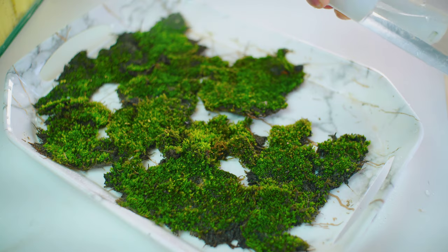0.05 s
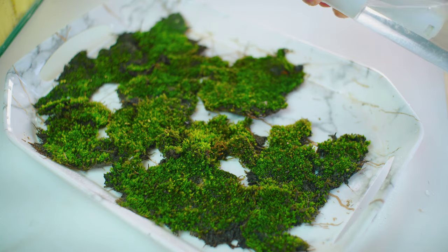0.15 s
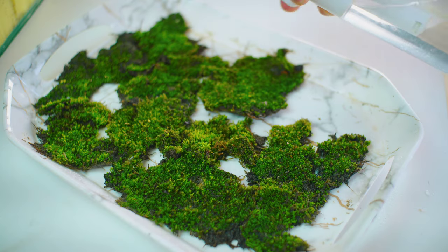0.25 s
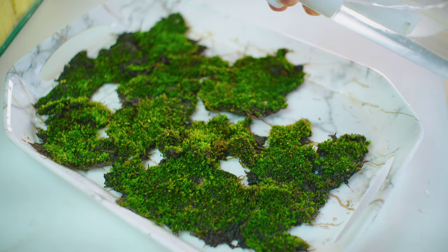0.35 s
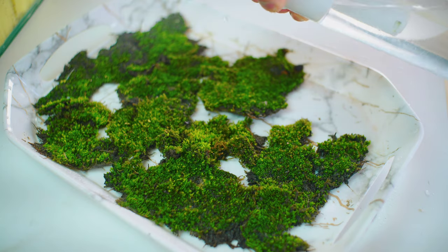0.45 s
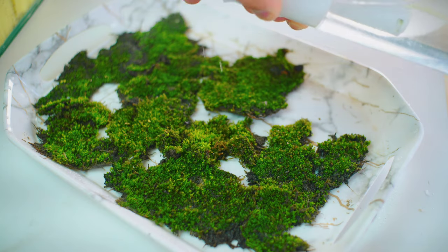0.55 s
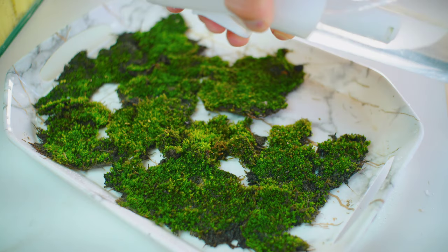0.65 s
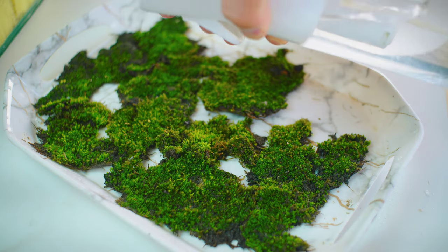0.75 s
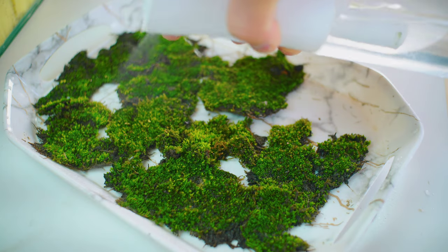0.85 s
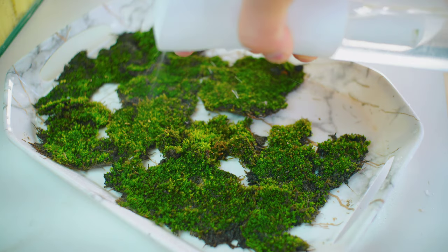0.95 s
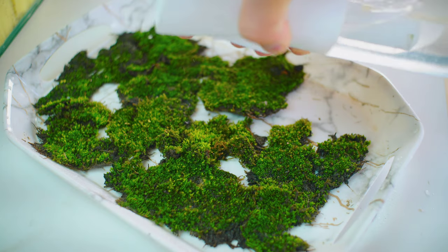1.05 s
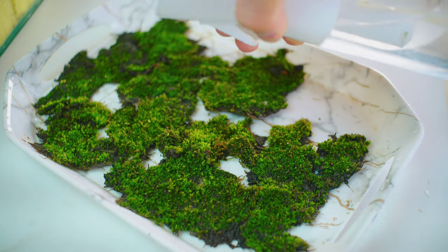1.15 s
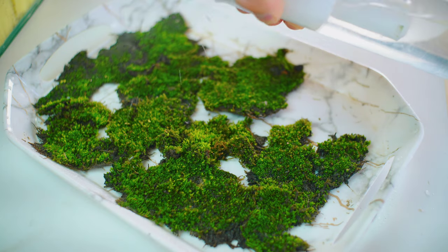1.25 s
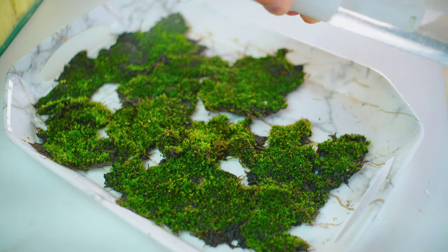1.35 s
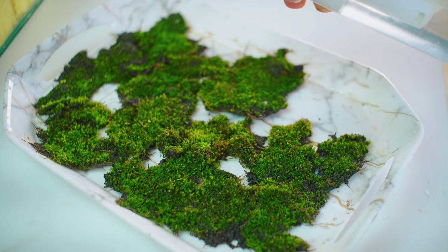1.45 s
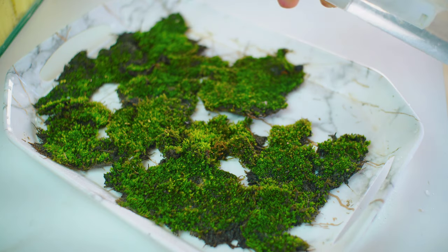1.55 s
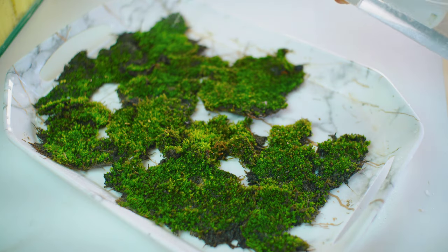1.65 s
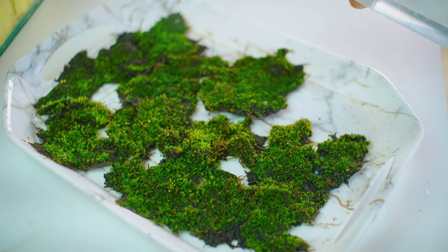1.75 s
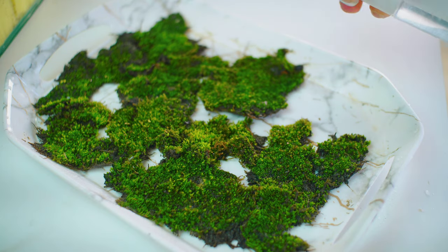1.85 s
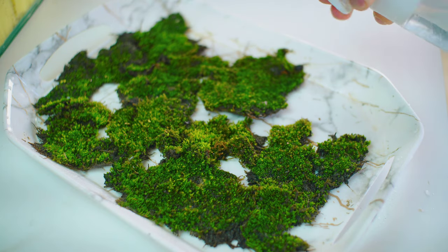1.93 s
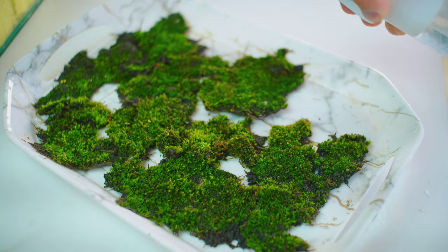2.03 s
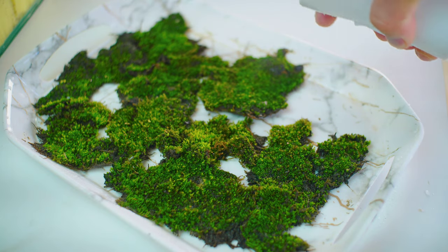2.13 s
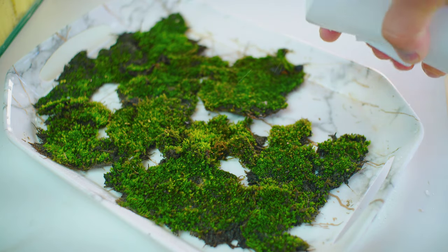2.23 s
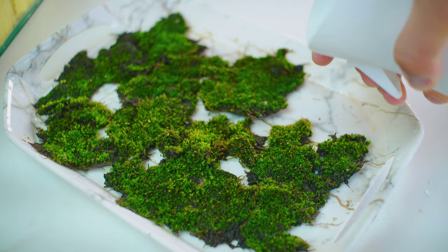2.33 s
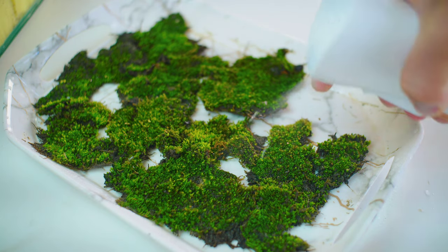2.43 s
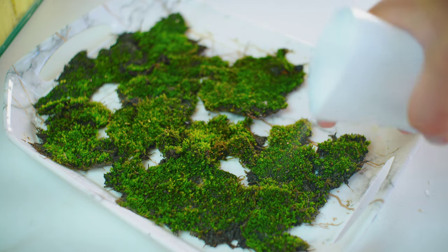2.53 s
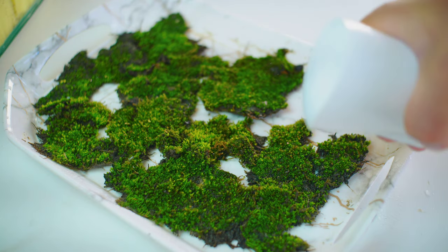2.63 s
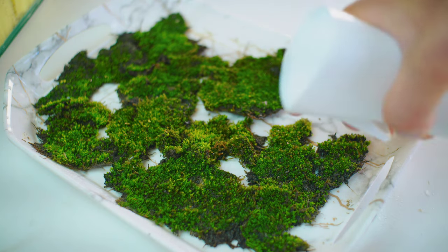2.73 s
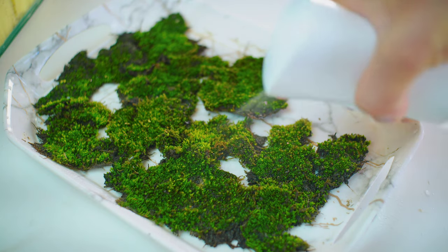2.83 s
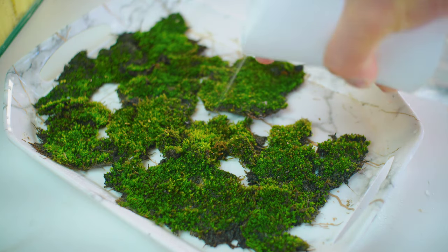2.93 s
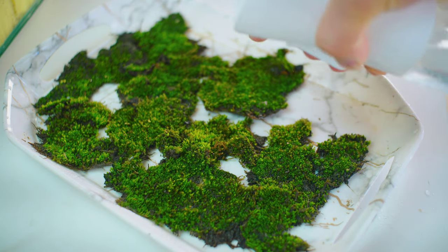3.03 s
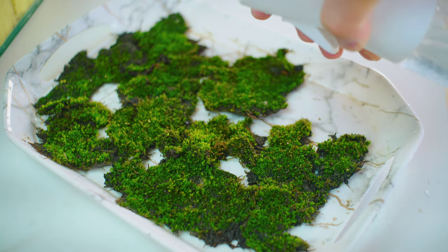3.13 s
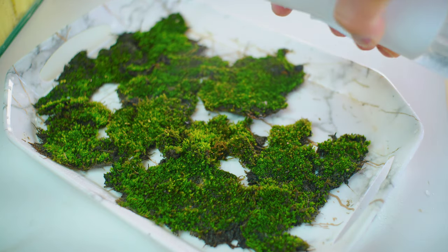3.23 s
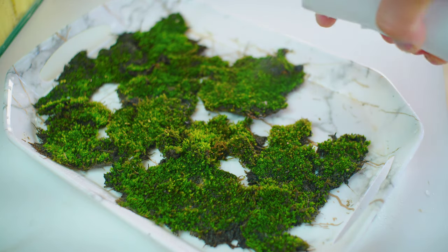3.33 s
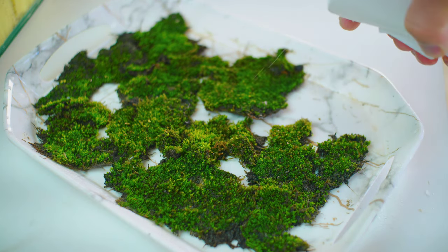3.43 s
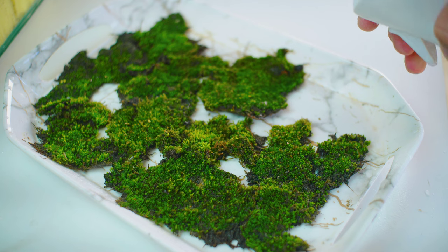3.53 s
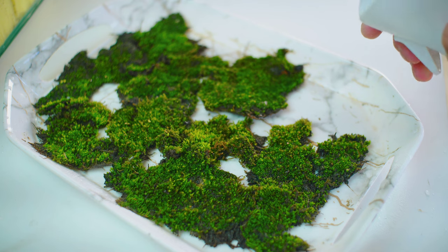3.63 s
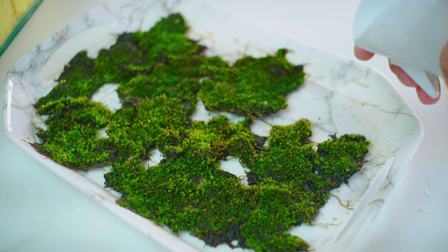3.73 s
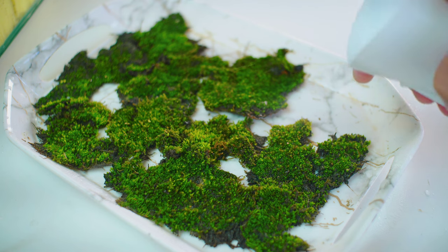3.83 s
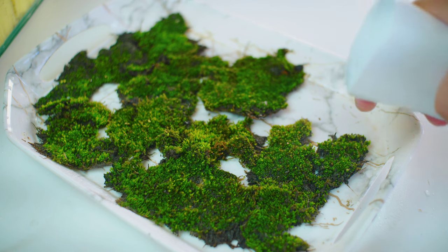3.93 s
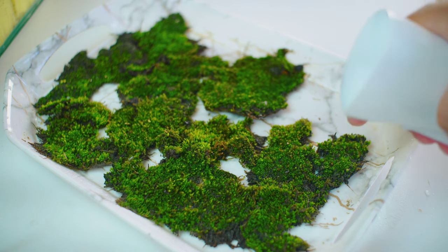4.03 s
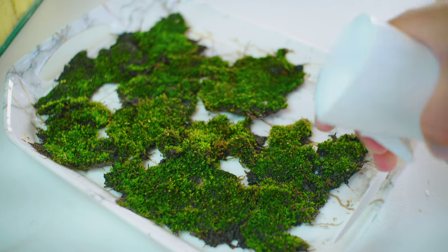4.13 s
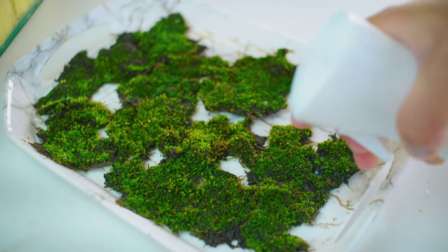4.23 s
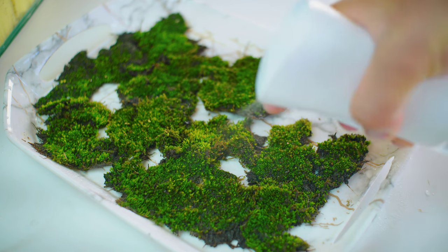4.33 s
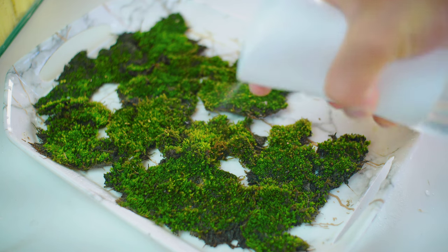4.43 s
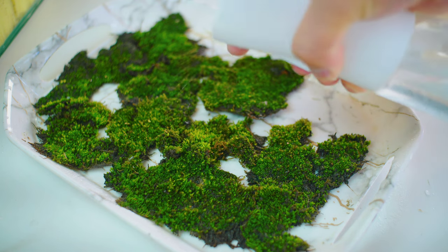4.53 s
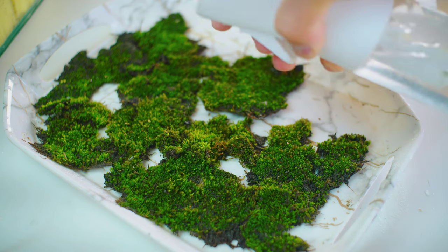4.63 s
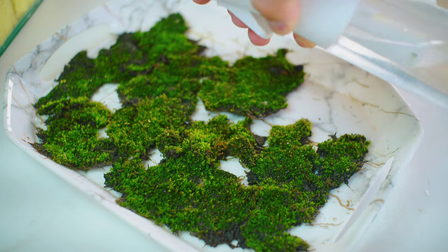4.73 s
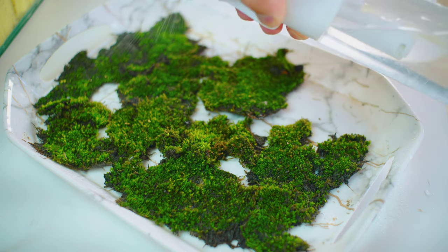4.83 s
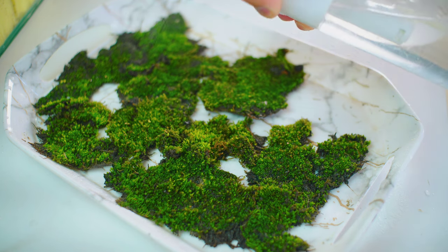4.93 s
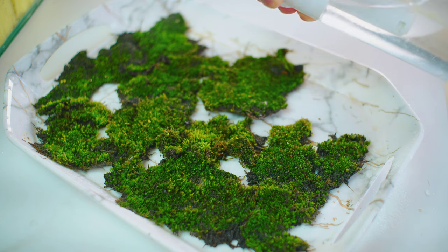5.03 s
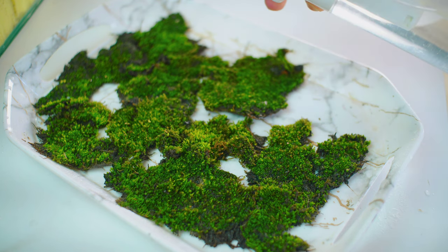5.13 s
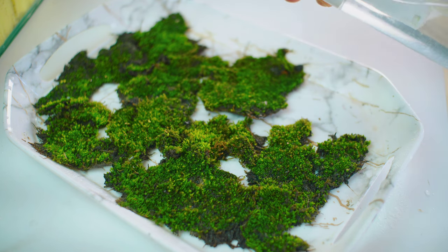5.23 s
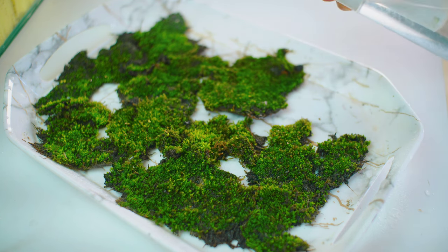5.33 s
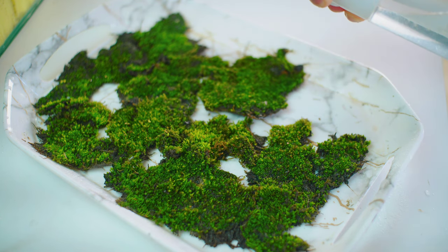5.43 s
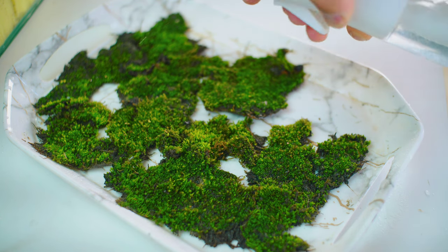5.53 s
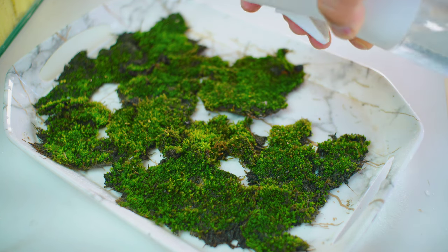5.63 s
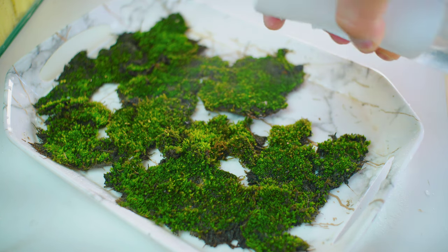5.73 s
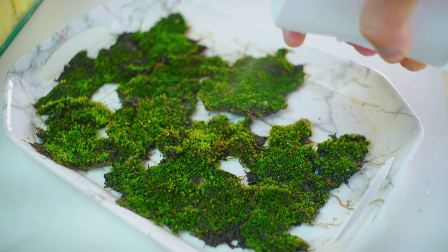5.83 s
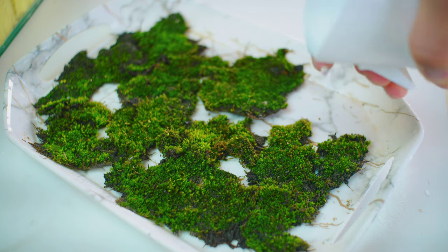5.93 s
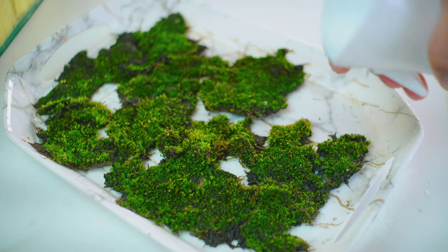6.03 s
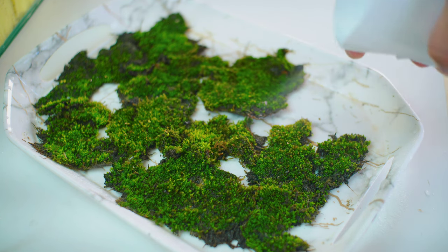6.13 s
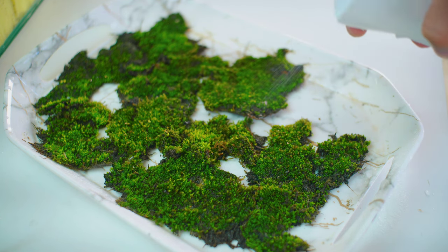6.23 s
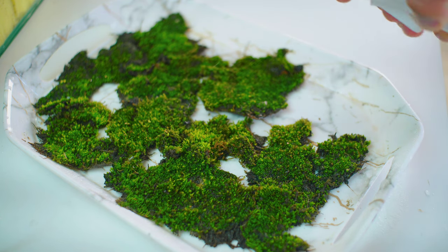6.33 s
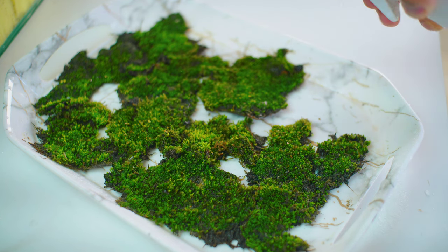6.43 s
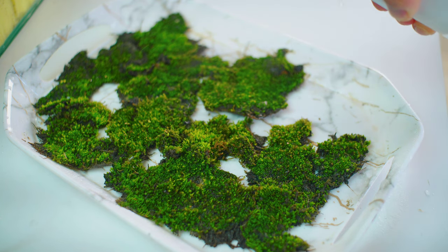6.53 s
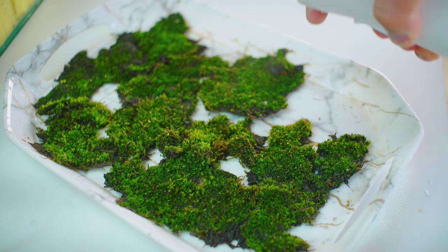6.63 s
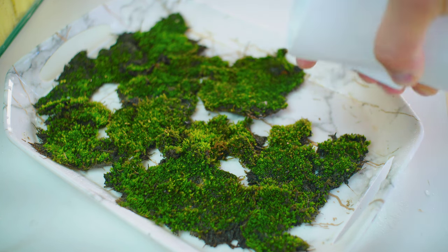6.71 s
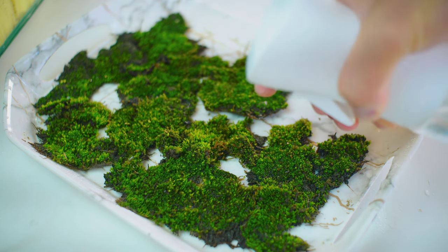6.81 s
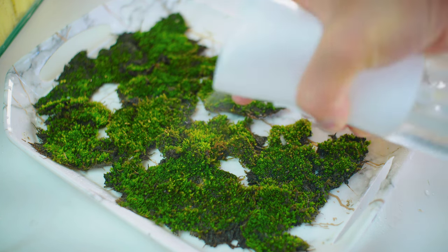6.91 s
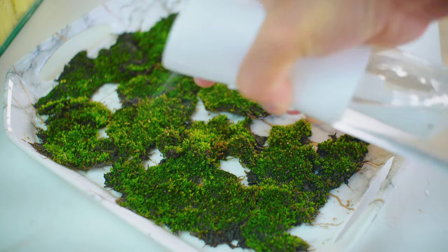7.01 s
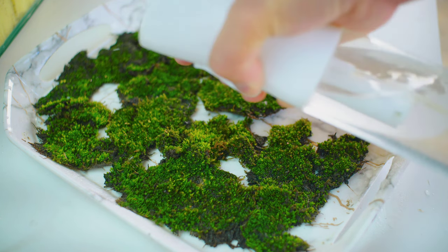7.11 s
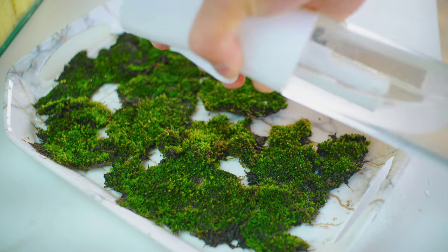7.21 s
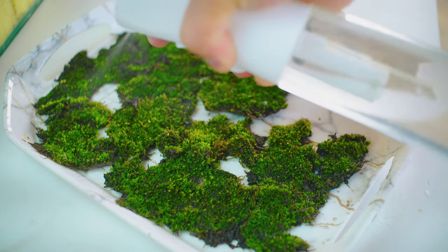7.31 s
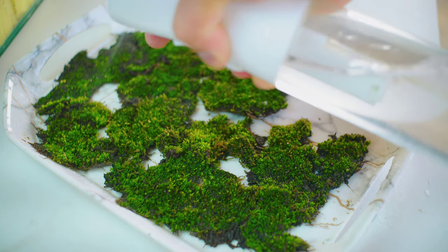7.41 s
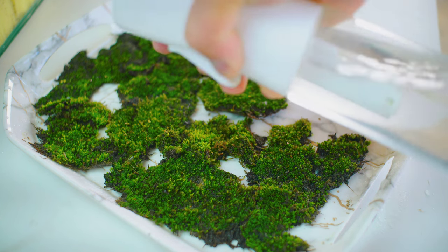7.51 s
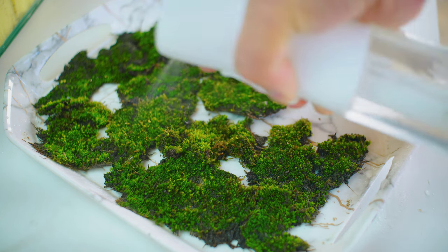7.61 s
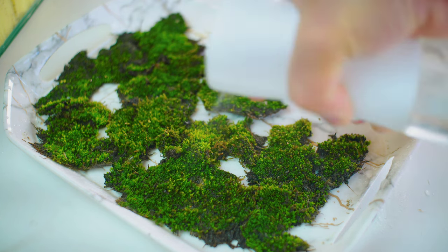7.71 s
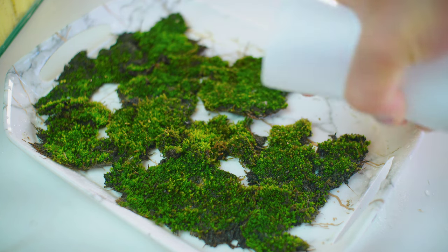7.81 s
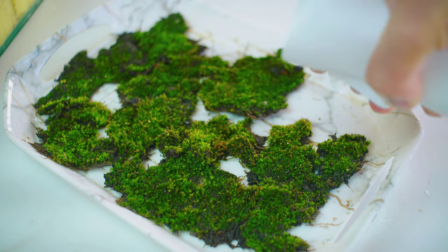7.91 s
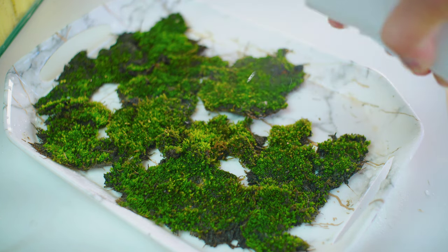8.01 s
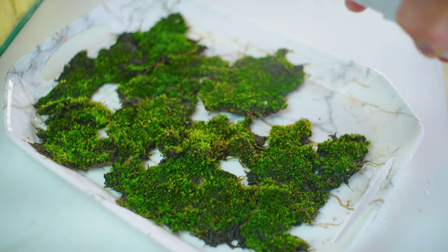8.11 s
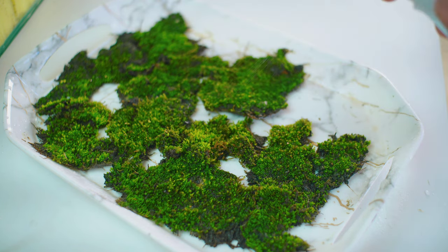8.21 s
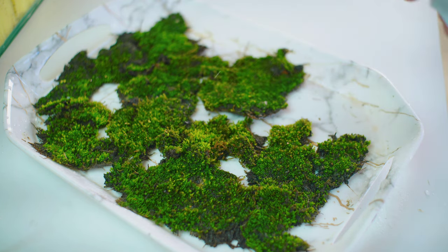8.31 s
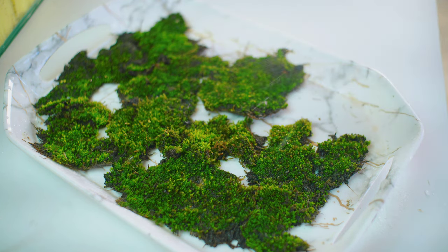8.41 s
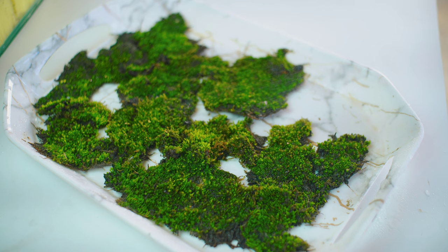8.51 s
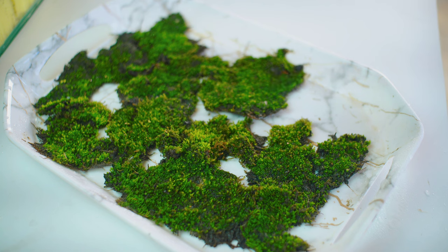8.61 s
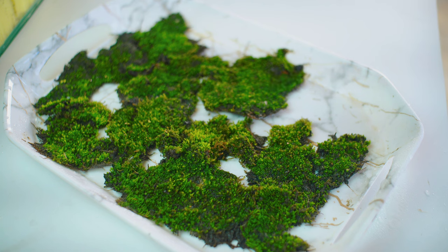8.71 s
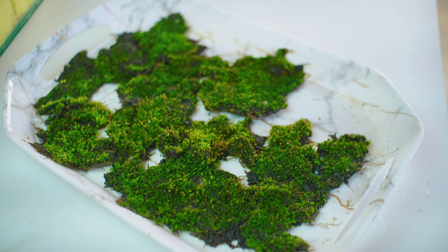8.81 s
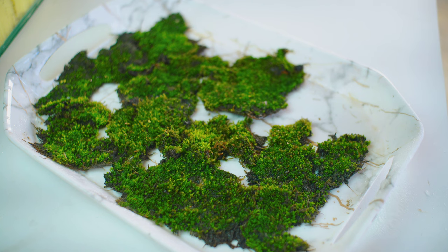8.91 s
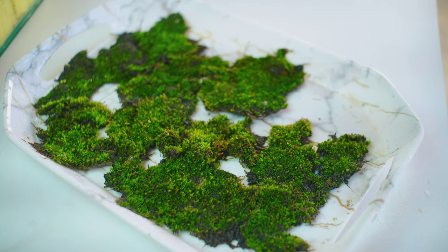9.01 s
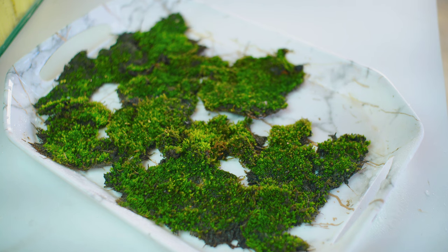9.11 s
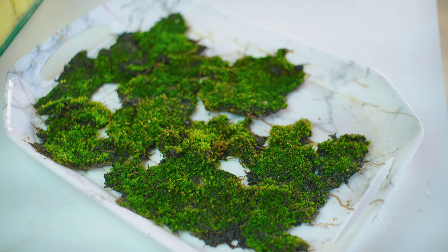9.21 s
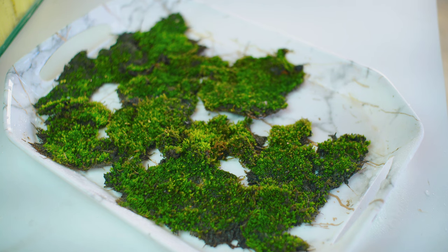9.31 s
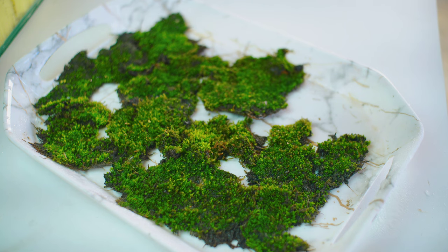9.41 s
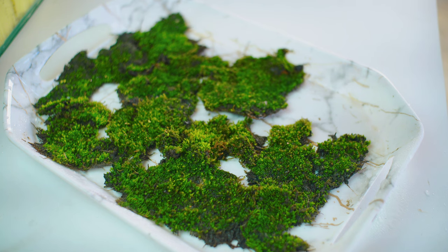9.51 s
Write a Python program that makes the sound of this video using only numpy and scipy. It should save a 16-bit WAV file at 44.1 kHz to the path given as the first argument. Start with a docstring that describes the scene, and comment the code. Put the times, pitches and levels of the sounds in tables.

```python
"""A quiet room, a stereo microphone close to a dish: a hand pumps a trigger spray bottle over it.
Each squeeze first spits air through the wet nozzle (a gliding chirp and whistle-coloured noise), then hisses
shaped noise that sags with the pressure. The trigger scrapes back as grainy noise, plastic parts tick and knock
as damped sines with noise cracks, and the pump gurgles as noise through the hollow bottle's resonances.
Valve squeaks are rough glides; a table echo and faint room hush lie behind."""
import sys
import numpy as np
from scipy import signal
from scipy.fft import rfft, irfft, next_fast_len
from scipy.io import wavfile
from scipy.ndimage import uniform_filter1d, map_coordinates

SR = 44100
rng = np.random.default_rng(int(sys.argv[2]) if len(sys.argv) > 2 else 0)


def persist_wave(psi):
    """Save psi, clipped to +-1, as 16-bit WAV."""
    counts = np.round(np.clip(psi, -1, 1) * 32767).astype(np.int16)
    wavfile.write(sys.argv[1], SR, np.atleast_2d(counts).T)


def level_to_linear(level):
    """Convert decibel levels to linear amplitude factors, elementwise."""
    exponent = np.asarray(level, float) / 20
    return 10 ** exponent


N = 421596  # samples

# Source levels in the tables are nominal, ahead of the bottle's bass loss and the fader.
# each squeeze: [start t/s, mist level/dB, whistle f/Hz, chirp's nominal share of spit power 0-1, chirp start f/Hz]
SQUEEZES = [(.079, -34, 4830, 0.02, 2980), (.455, -34.5, 6700, 0.46, 2150), (.881, -30.5, 5040, 0.34, 1750),
            (1.295, -35, 4830, 0.2, 1534), (1.691, -35, 4750, 0.35, 1750), (2.088, -35, 4860, 0.1, 3590),
            (2.472, -35.5, 8100, 0.12, 3375), (2.87, -35, 4840, 0.01, 3570),
            (3.257, -35.5, 6400, 0.1, 3160), (3.884, -32, 5180, 0, 3200), (4.385, -32, 4780, .31, 1520),
            (4.887, -33, 6630, 0.62, 1733), (5.33, -34, 4770, 0.61, 1832), (5.747, -33, 4700, 0.22, 2044),
            (6.14, -32.5, 4900, 0, 3500), (6.547, -32.5, 6450, 0.16, 1645), (6.931, -33, 5060, 0.22, 3250),
            (7.317, -33.5, 4380, 0.12, 2030), (7.688, -34.5, 6680, 0.23, 1980), (8.067, -34, 4580, 0, 3230),
            (8.444, -31, 7050, 0.3, 2400)]
# the trigger scrapes back and the pump refills: [t/s, scrape peak level/dB, gurgle level/dB]
RETURNS = [(0.322, -27.5, -55.5), (0.7295, -30, -61), (1.145, -31, -53.5), (1.5492, -30.5, -55),
           (1.94, -30, -55), (2.324, -34, -48), (2.728, -30.5, -44.5), (3.1004, -29, -56),
           (3.544, -34, -55.5), (4.142, -40, -50), (4.6637, -33, -52.5), (5.1602, -36, -52.5),
           (5.587, -33, -50), (5.999, -49, -50.5), (6.439, -34.5, -53), (6.796, -36, -49.5),
           (7.184, -33.5, -57), (7.575, -31.5, -53.5), (7.9275, -28.5, -49), (8.327, -29.5, -57),
           (8.6976, -35, -62.5)]
# colour of the mist: [f/Hz, relative density level/dB per Hz]
MIST_COLOUR = [(200, -31), (585, -15.5), (874, -7), (1260, -12), (1590, -2.5), (4030, 1), (7220, -3),
               (15500, 0)]
# colour of the scrape: [f/Hz, relative density level/dB per Hz]
SCRAPE_COLOUR = [(710, -41), (1200, -12.5), (1880, -0.5), (4530, -2.5), (15500, -24)]
# small plastic ticks: [t/s, peak level/dB, f/Hz]
TICKS = [(0.484, -18, 7500), (1.491, -25.5, 4770), (2.6846, -21.5, 5340), (2.8627, -22, 4870),
         (3.876, -24, 5170), (6.4117, -30.5, 4200), (7.5487, -18, 4120), (7.895, -15.5, 3720),
         (8.684, -28, 4170), (8.826, -46, 2680), (9.024, -43, 1180)]
# the finger takes up the trigger's play: [t/s]
TAKE_UPS = [.8236, 1.256, 1.651, 2.049, 4.769, 5.258, 5.704, 6.523, 6.899, 7.282, 7.6474, 8.0192, 8.423]
# the trigger hits its stop: [t/s, peak level/dB]
KNOCKS = [(2.375, -7), (2.771, -7.5), (4.206, -14), (4.739, -23.5), (5.228, -29), (5.655, -27),
          (6.071, -19.5), (6.865, -26)]
# the bottle's modes: [f/Hz, mean relative level/dB, t60/s]
BOTTLE_MODES = [(925, -5, 0.027), (2094, 0.5, 0.0084), (2950, -4, 0.01), (4700, 4, 0.0032)]
# one hollow low knock: [t/s, level/dB, f/Hz, t60/s]
THUD = (7.894, -33, 378, 0.019)
# air drawn past the valve: [t/s, length/s, start f/Hz, end f/Hz, level/dB]
SQUEAKS = [(3.59, 0.098, 920, 834, -49), (3.682, .07, 760, 560, -53), (4.315, 0.06, 2250, 900, -50.5),
           (8.883, 0.061, 1280, 880, -51), (8.862, 0.019, 1400, 1220, -53), (8.94, 0.053, 960, 930, -56),
           (4.805, 0.03, 1480, 1520, -50.5)]
# resonances of the air in the bottle: [f/Hz, width/Hz, relative level/dB]
HOLLOW = [(880, 85, -1.5), (2400, 1800, -15.5)]
# left-right likeness of near sounds: [f/Hz, correlation -1 to 1]
NEAR_LIKENESS = [(1000, 0.96), (5000, 0.88), (13000, 0.12)]
# colour of the room hush: [f/Hz, relative density level/dB per Hz]
ROOM_COLOUR = [(30, -26), (70, -42), (145, -20), (253, -12), (340, -4.5), (2420, 0), (15500, -16)]
# the level opens, dips briefly and is faded up, then holds: [t/s, level/dB]
START_LEVEL = [(.0315, -69), (.033, 10), (.084, -5.5), (.097, -33), (.13, -4), (.4, 6.5)]

# nominal end of every chirp and the time it takes to get there
FILM_END_HZ, GLIDE_S = 2927, 0.01022
# a usual squeeze; its jet falters this long before the trigger is let go
USUAL_MIST_DB, SAG_DB_PER_S, FALTER_S = -34, 57, 0.09
# a harder squeeze starts louder, sags faster and lasts longer
MORE_SAG_PER_DB, MORE_STROKE_S_PER_DB = 13.5, 0.0305


def unit(x):
    """Brings x to rms 1."""
    return x / np.sqrt(np.mean(x ** 2) + 1e-20)


def along(points, hz):
    """Interpolates (f/Hz, value) points on a log axis."""
    f, v = np.transpose(points)
    return np.interp(np.log(hz + 1), np.log(f + 1), v)


def curves(rows):
    """Gives one value per sample for each column after the time."""
    s, *cols = np.transpose(rows)
    return [np.interp(np.arange(N) / SR, s, c) for c in cols]


def wobble(rate):
    """A smooth random curve, rate knots a second."""
    knots = rng.standard_normal(int(N * rate / SR) + 4)
    return map_coordinates(knots, [np.arange(N) * rate / SR])


def filtered(x, response):
    """Multiplies the spectrum of x by a response of frequency."""
    m = next_fast_len(x.shape[-1] + 8192)
    return irfft(rfft(x, m) * response(np.fft.rfftfreq(m, 1 / SR)), m)[..., :x.shape[-1]]


def hump(hz, centre, width):
    """A flat-topped band gain."""
    return 1 / (1 + ((hz - centre) / width) ** 4)


def highpass(hz, corner, power=4):
    """A gain that falls below the corner."""
    return 1 / (1 + (corner / (hz + 1)) ** power)


def ramp(t, rise):
    """A straight rise from 0 to 1."""
    return np.clip(t / rise, 0, 1)


def rush(gain, alike, lumpy_db, rate, patchy_db):
    """Stereo noise of rms 1, in lumps of level and patches of colour that both sides share."""
    lumps = level_to_linear(lumpy_db * wobble(rate))
    z = signal.stft(rng.standard_normal((2, N)) * lumps, nperseg=256)[2]
    field = uniform_filter1d(rng.standard_normal(z.shape[1:]), size=3, axis=0)
    field = uniform_filter1d(field, size=8, axis=1)
    pair = signal.istft(z * level_to_linear(patchy_db * unit(field)), nperseg=256)[1][:, :N]

    def mid_side_gain(hz):
        angle = np.arccos(np.clip(along(alike, hz), -1, 1)) / 2
        return gain(hz) * np.array([np.cos(angle), np.sin(angle)])

    mid, side = filtered(pair, mid_side_gain)
    return unit(np.array([mid + side, mid - side]))


def add(track, s, sound):
    """Mixes a sound into a track at s."""
    part = track[round(s * SR):][:len(sound)]
    part += sound[:len(part)]


def jets():
    """Start, level, sag and stroke of each squeeze's mist: pressing harder is louder, sags faster, lasts longer."""
    rows = []
    for (s, db, *_), (let_go, *_) in zip(SQUEEZES, RETURNS):
        harder_db = db - USUAL_MIST_DB
        sag_db_per_s = SAG_DB_PER_S + MORE_SAG_PER_DB * harder_db
        stroke_s = let_go - FALTER_S - s + MORE_STROKE_S_PER_DB * harder_db
        rows.append((s, db, sag_db_per_s, stroke_s))
    return rows


def slack(from_hz):
    """0 for a taut film that starts high, towards 1 the lower it starts."""
    return np.clip(1 - from_hz / FILM_END_HZ, 0, 1)


def mist():
    """The jet hisses; as the pressure sags the treble goes first, and after the stroke it dies away."""
    dying_db_per_s, treble_db = 115, -2
    body, treble, t = np.zeros(N), np.zeros(N), np.arange(SR // 2) / SR
    for (s, db, sag_db, stroke), (*_, from_hz) in zip(jets(), SQUEEZES):
        loss_db = sag_db * t + dying_db_per_s * np.maximum(t - stroke, 0)
        add(body, s, level_to_linear(db - loss_db) * ramp(t, 0.026) ** 0.5)
        # the treble starts when water reaches the nozzle, later behind a slack film
        water_s = 0.0031 + 0.053 * slack(from_hz)
        treble_level = level_to_linear(db + treble_db - 1.38 * loss_db - 55 * t)
        add(treble, s, treble_level * ramp(t - water_s, 0.0096))

    def low_gain(hz):
        return level_to_linear(along(MIST_COLOUR, hz)) * np.sqrt(1 - highpass(hz, 8000, 8))

    def high_gain(hz):
        return level_to_linear(along(MIST_COLOUR, hz)) * np.sqrt(highpass(hz, 8000, 8))

    low = rush(low_gain, NEAR_LIKENESS, lumpy_db=1.3, rate=250, patchy_db=2.4)
    high = rush(high_gain, NEAR_LIKENESS, lumpy_db=1.9, rate=300, patchy_db=2.3)
    return body * low + treble * high * level_to_linear([[1.1], [-1.1]])  # treble leans left


def spits():
    """Air leaves first: the nozzle film chirps and the swirl chamber whistles, until the water snaps through."""
    spit_db = -23.5  # the same pocket of air each time
    out, t = np.zeros(N), np.arange(8192) / SR
    for s, _, whistle_hz, share, from_hz in SQUEEZES:
        noise = rng.standard_normal((4, len(t)))
        # a taut film bursts at once, a slack one yields slowly
        burst = ramp(t - 0.003, 0.0031 + 0.01 * slack(from_hz))
        swell_14ms = burst * level_to_linear(-2500 * np.maximum(t - 0.014, 0))
        swell_16ms = burst * level_to_linear(-2500 * np.maximum(t - 0.016, 0))

        glide_hz = from_hz + (FILM_END_HZ - from_hz) * ramp(t - 0.005, GLIDE_S)
        flutter = 1 + 0.5 * unit(uniform_filter1d(noise[0], size=40))
        detune = 1 + 0.03 * noise[0, 1] + 0.04 * (flutter - 1)  # per-spit offset and flutter
        phase = 2 * np.pi * np.cumsum(glide_hz * detune) / SR
        chirp = flutter * np.sin(phase) * swell_14ms

        narrow = unit(filtered(noise[1], lambda hz: hump(hz, whistle_hz, 400)))
        broad = unit(filtered(noise[2], lambda hz: hump(hz, 5500, 2400)))
        snap_s = 0.011 + 0.012 * slack(from_hz)
        snap_level = level_to_linear(-7 + 4 * noise[0, 0] - 4000 * abs(t - snap_s))
        snap = unit(np.diff(noise[3], 2, prepend=[0, 0])) * snap_level
        linger = level_to_linear(-18.5 - 112 * t) * ramp(t, 0.03)  # the chamber keeps colouring the jet
        air = (0.42 * swell_16ms + linger) * narrow + 0.38 * swell_14ms * broad + 0.94 * snap

        chirp_part = np.sqrt(np.clip(share, 0, 1)) * chirp
        air_part = np.sqrt(np.clip(1 - share, 0, 1)) * air
        add(out, s - 0.004, level_to_linear(spit_db) * (chirp_part + air_part))
    return out


def splutter(count=14):
    """Trapped air pops out of the jet, mostly early in each squeeze: short wet blips of a few cycles."""
    out, t = np.zeros(N), np.arange(256) / SR
    for s, db, sag_db, stroke in jets():
        for when, pitch, size in rng.random((count, 3)):
            late = 0.02 + stroke * when ** 2
            hz = 1500 * 8 ** pitch
            blip = np.sin(2 * np.pi * hz * t) * level_to_linear(-60 * t * hz / 18) * ramp(t, 0.00067)
            add(out, s + late, level_to_linear(db - sag_db * late + 9.2 * size) * blip)
    return out


def trigger_returns():
    """Stick-slip of the piston: a grainy scrape that sinks slowly while the spring pushes, then fades fast."""
    crest_db = 17  # nominal peak over rms
    drive, t = np.zeros(N), np.arange(SR // 3) / SR
    for s, db, _ in RETURNS:
        fall_db = 70 * t + 240 * np.maximum(t - 0.055, 0)
        add(drive, s, level_to_linear(db - crest_db - fall_db) * ramp(t, 0.0012))
    grain = rush(lambda hz: level_to_linear(along(SCRAPE_COLOUR, hz)), NEAR_LIKENESS, lumpy_db=3, rate=120, patchy_db=0.5)
    return drive * grain


def ticks():
    """A few damped cycles over a very short crack; gentle contacts are softer and longer."""
    out, t = np.zeros(N), np.arange(1024) / SR
    take_ups = [(s, -34, 2700) for s in TAKE_UPS]  # t/s, level/dB, f/Hz
    bottoms = []  # the piston bottoms out
    for s, db, *_ in SQUEEZES:
        late, size = rng.standard_normal(2)
        bottoms.append((s + 0.047 + 0.004 * late, db + 8 + 3 * size, 1750))
    for s, db, hz in TICKS + take_ups + bottoms:
        crack = unit(filtered(rng.standard_normal(len(t)), lambda f: hump(f, 1.1 * hz, 0.55 * hz)))
        u = t * level_to_linear(0.34 * (db + 21.0))  # time runs slower for a gentle contact
        contact = 0.75 * np.sin(2 * np.pi * hz * t) + 0.43 * crack
        add(out, s, level_to_linear(db - 60 * u / 0.0077) * contact * ramp(u, 0.00029))
    return out


def knocks():
    """Each knock cracks and rings the bottle's modes."""
    crest_db = 5  # nominal peak over a single mode
    out, t = np.zeros(N), np.arange(2048) / SR
    for s, db in KNOCKS:
        ring = np.zeros(len(t))
        for hz, level, t60 in BOTTLE_MODES:
            ring += level_to_linear(level + rng.normal(0, 1.4) - 60 * t / t60) * np.sin(2 * np.pi * hz * t)
        crack = unit(filtered(rng.standard_normal(len(t)), lambda f: hump(f, 4200, 2600)))
        crack = 0.7 * crack * level_to_linear(-60 * t / 0.0028)
        add(out, s, level_to_linear(db - crest_db) * (ring + crack) * (1 - np.exp(-t / 0.0011)))
    return out


def thud():
    """A hollow low knock: one damped sine."""
    out, t = np.zeros(N), np.arange(4096) / SR
    s, db, hz, t60 = THUD
    add(out, s, level_to_linear(db - 60 * t / t60) * np.sin(2 * np.pi * hz * t))
    return out


def squeaks():
    """Air drawn past the valve: a rough, broken glide with a weak overtone."""
    out, broken, waver = np.zeros(N), level_to_linear(4.6 * wobble(150)), wobble(300)
    for s, length, from_hz, to_hz, db in SQUEAKS:
        u = np.linspace(0, 1, round(length * SR))
        rough = 1 + 0.045 * waver[round(s * SR):][:len(u)]
        phase = 2 * np.pi * np.cumsum((from_hz + (to_hz - from_hz) * u) * rough) / SR
        tone = np.sin(phase) + 0.12 * np.sin(3 * phase)
        add(out, s, level_to_linear(db) * np.sin(np.pi * u) ** 0.41 * tone)
    return out * broken


def gurgle():
    """Bubbles burst unevenly in the hollow bottle as the pump refills; the intake sips air in sharp bursts."""
    stop_s = 0.065  # the trigger is back at rest; the refill rises until then and steps to full level
    sip_start_s, sip_s, sip_db, sip_db_per_s = 0.049, 0.12, -70, 45  # louder in a long pause
    drive, suction, t = np.zeros(N), np.zeros(N), np.arange(SR // 2) / SR
    next_starts = SQUEEZES[1:] + RETURNS[-1:]  # the last pause counts as zero
    for (s, _, db), (again, *_) in zip(RETURNS, next_starts):
        sip_level_db = sip_db + sip_db_per_s * (again - s) - 150 * np.maximum(t - sip_s, 0)
        add(suction, s + sip_start_s, level_to_linear(sip_level_db) * ramp(t, 0.02))
        refill = np.where(t < stop_s, 6 * t, 1)
        add(drive, s, level_to_linear(db - 56.4 * np.maximum(t - 0.13, 0)) * refill)

    def hollow(f):
        total = 0
        for k, (centre, width, db) in enumerate(HOLLOW):
            damping = 1j * f * width
            total = total + (-1) ** k * level_to_linear(db) * damping / (centre ** 2 - f * f + damping)
        return total

    bubbles = rush(hollow, NEAR_LIKENESS, lumpy_db=2.5, rate=100, patchy_db=1.5)
    sips = rush(lambda hz: hump(hz, 6400, 1100), NEAR_LIKENESS, lumpy_db=6.5, rate=200, patchy_db=1)
    return drive * bubbles + suction * sips


def table_echo(x):
    """Dish and table answer differently on each side: a decaying noise tail lasting some 46 ms."""
    t = np.arange(2048) / SR
    tail = rng.standard_normal((2, len(t))) * level_to_linear(-60 * t / 0.086)
    tail = filtered(tail, lambda hz: highpass(hz, 1300))
    return signal.fftconvolve(x[None], tail / np.linalg.norm(tail[0]), axes=1)[:, :N]


def room_hush():
    """The quiet room: slowly wavering noise, less alike left to right in the treble."""
    alike = [(300, 0.93), (700, 0.97), (12000, 0.4)]  # f/Hz, correlation
    hush = rush(lambda hz: level_to_linear(along(ROOM_COLOUR, hz)), alike, lumpy_db=1, rate=4.8, patchy_db=2)
    return level_to_linear(-64.5) * hush


def scene():
    """Bottle, its near echoes and the hush of the room."""
    sharp = spits() + splutter() + ticks() + knocks() + squeaks()
    sharp = filtered(sharp, lambda hz: highpass(hz, 300))
    near = sharp + level_to_linear(-10.0) * table_echo(sharp) + mist() + trigger_returns() + gurgle() + thud()
    # a small bottle radiates little bass
    near = filtered(near, lambda hz: 0.029 + 0.7 * highpass(hz, 550))
    return near + room_hush()


def top_cut(x):
    """Nothing passes above the cut-off."""
    return signal.sosfilt(signal.butter(12, 16640, fs=SR, output="sos"), x)


def record(dry):
    """The microphone's band limit, then the level dips briefly at the start and rises."""
    heard = filtered(dry, lambda hz: 1 / (1 + (hz / 15700) ** 90))
    mix = heard * level_to_linear(curves(START_LEVEL)[0])
    return top_cut(mix)


dry = scene()
out = record(dry)
persist_wave(out)
```